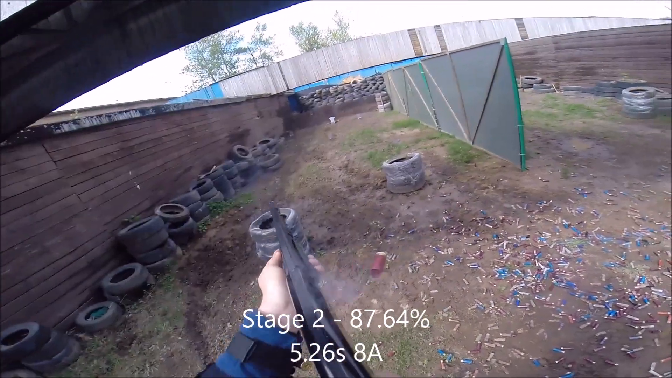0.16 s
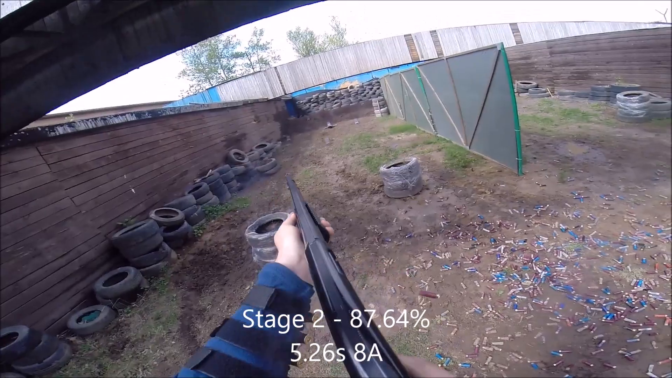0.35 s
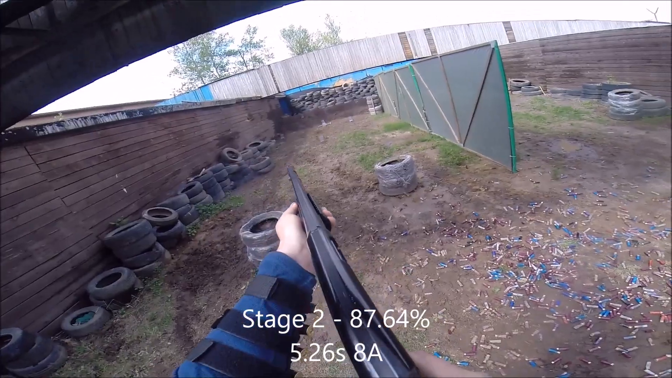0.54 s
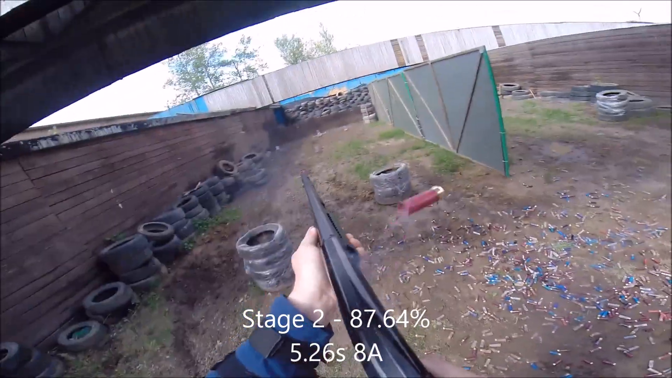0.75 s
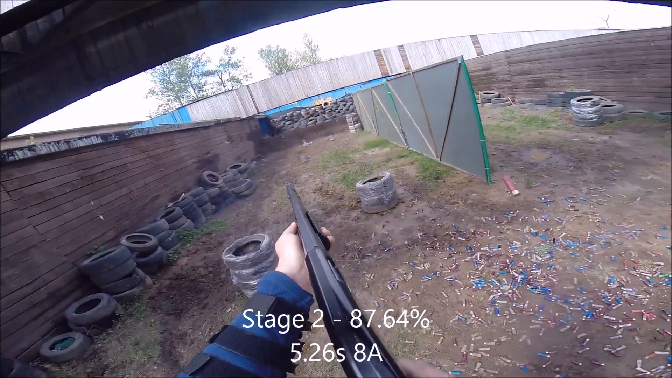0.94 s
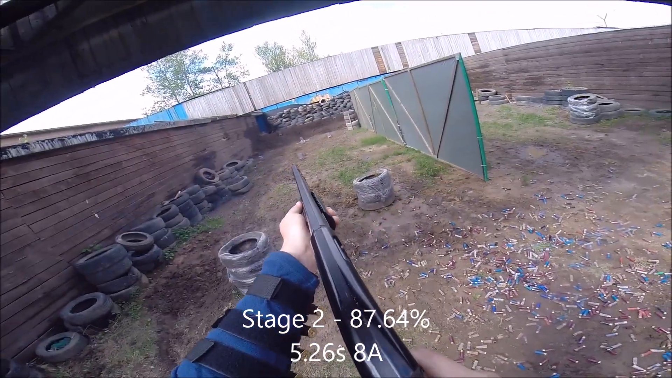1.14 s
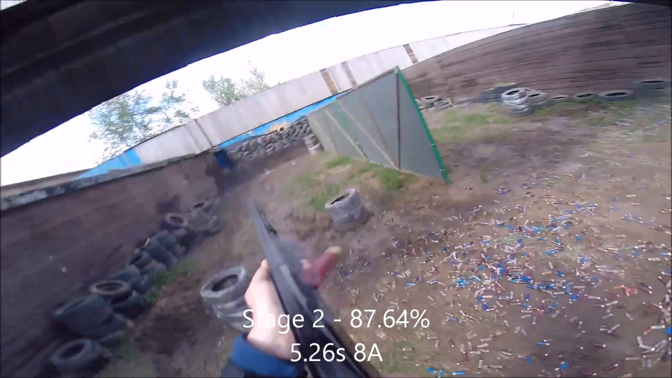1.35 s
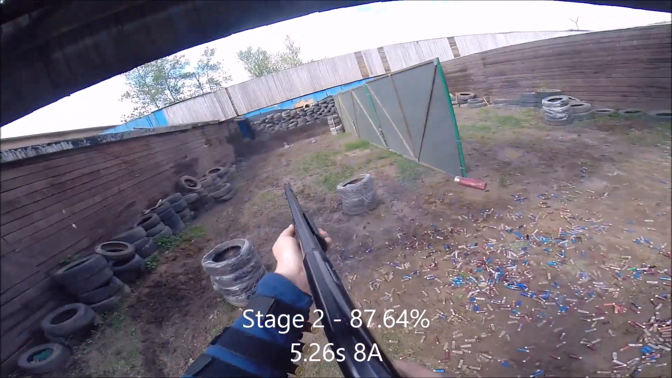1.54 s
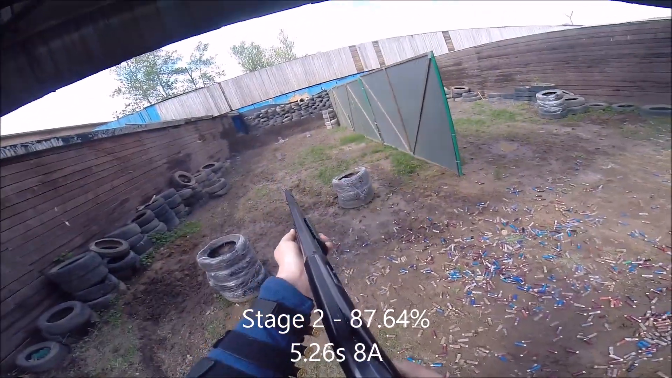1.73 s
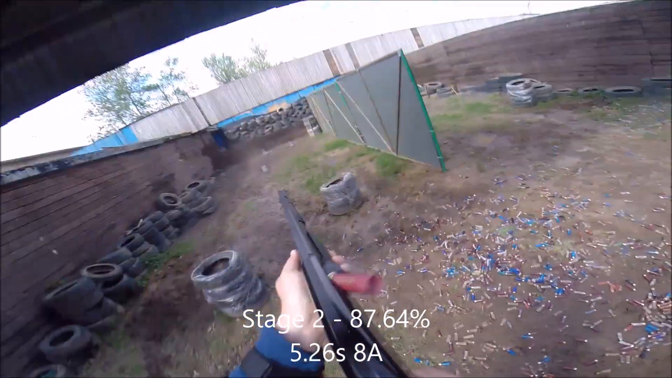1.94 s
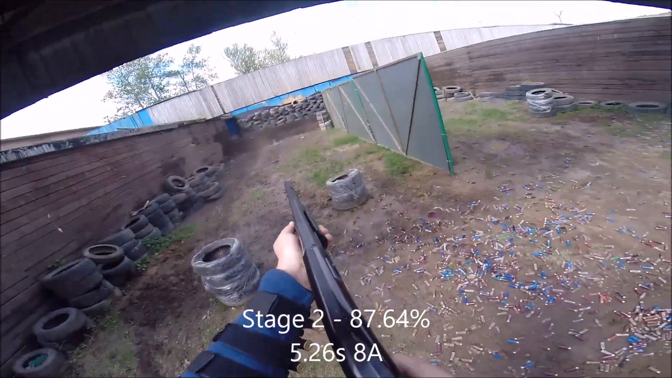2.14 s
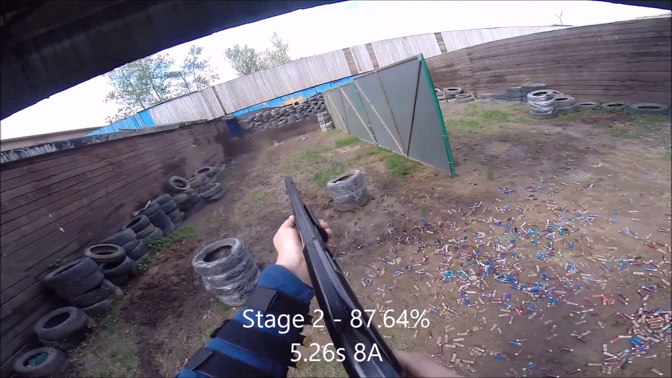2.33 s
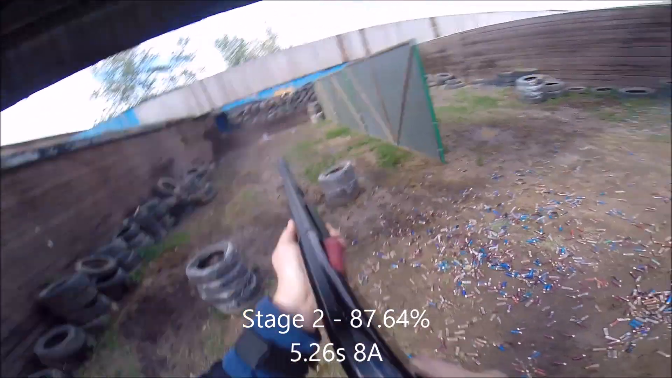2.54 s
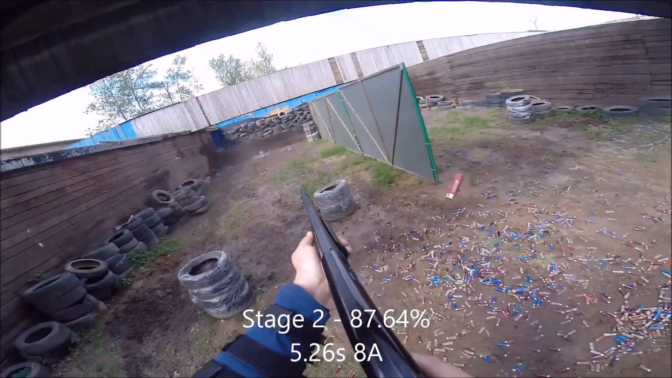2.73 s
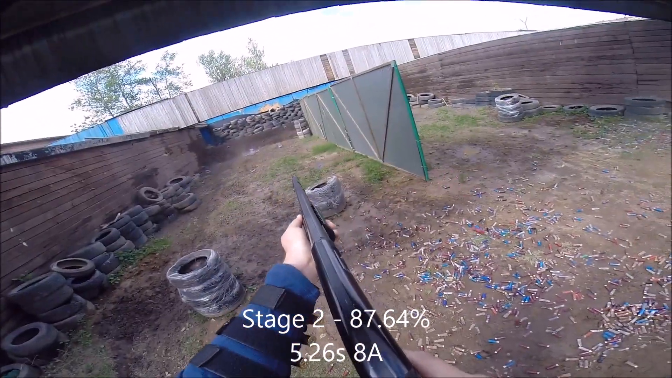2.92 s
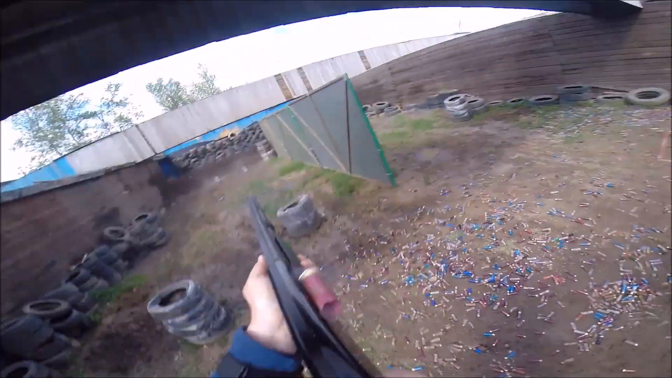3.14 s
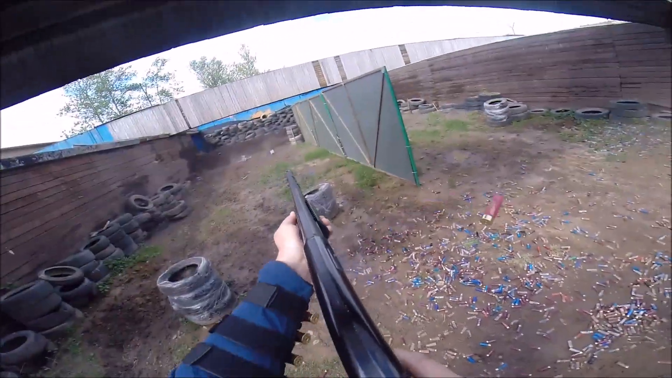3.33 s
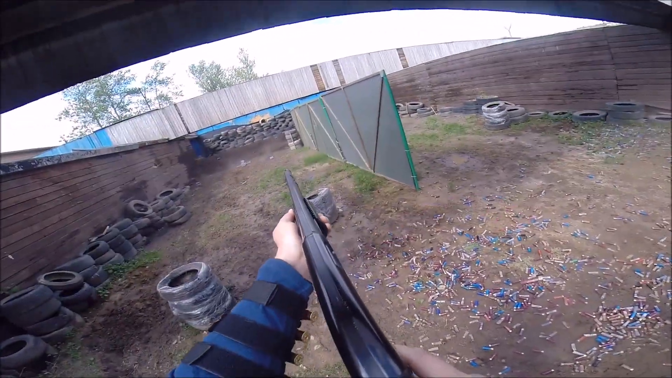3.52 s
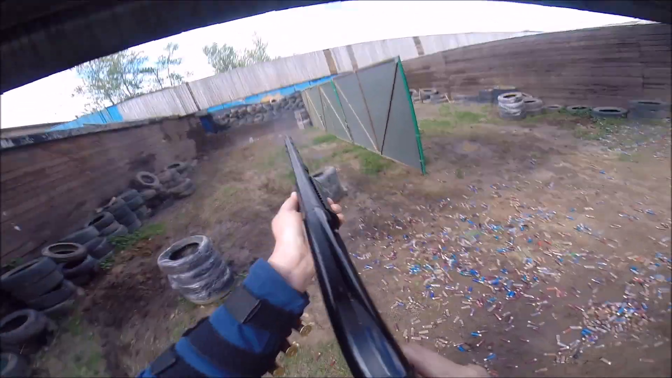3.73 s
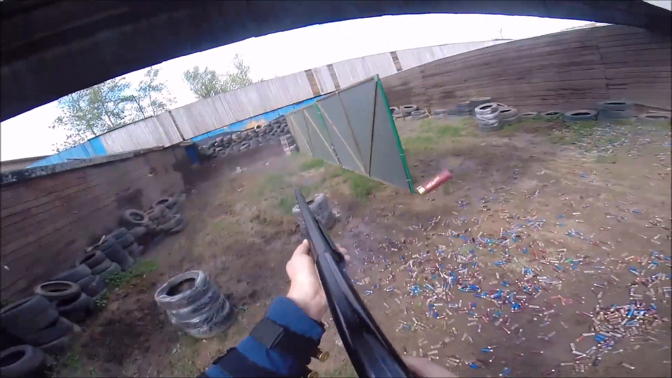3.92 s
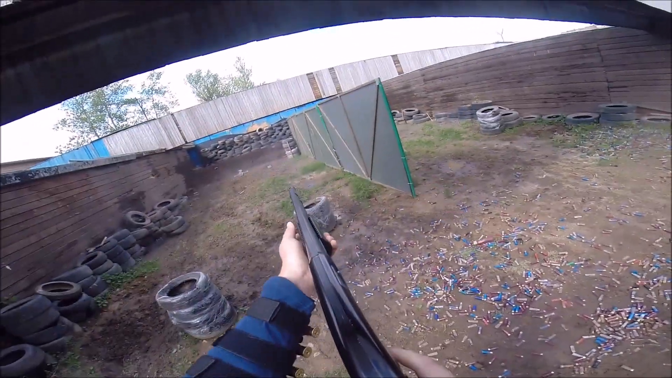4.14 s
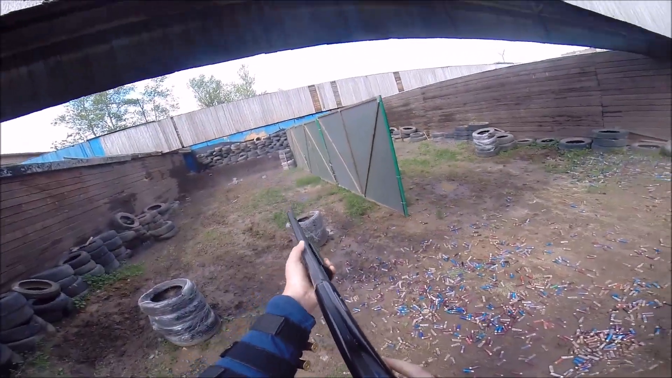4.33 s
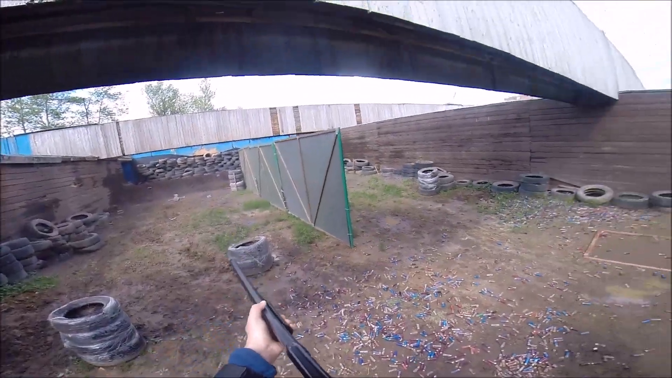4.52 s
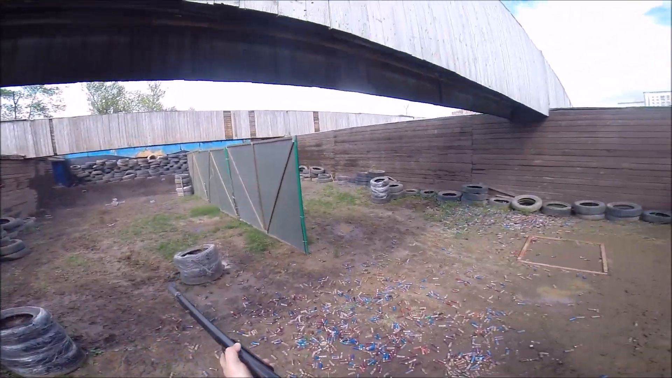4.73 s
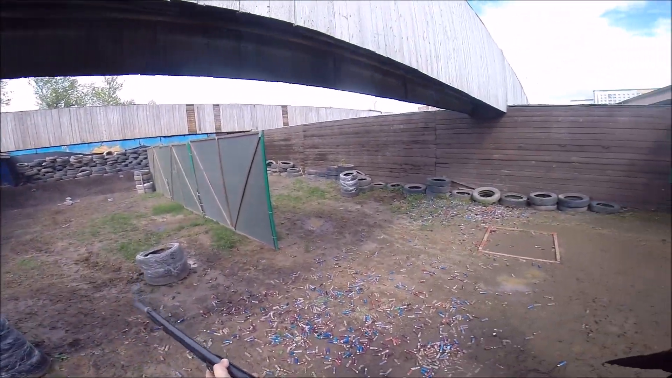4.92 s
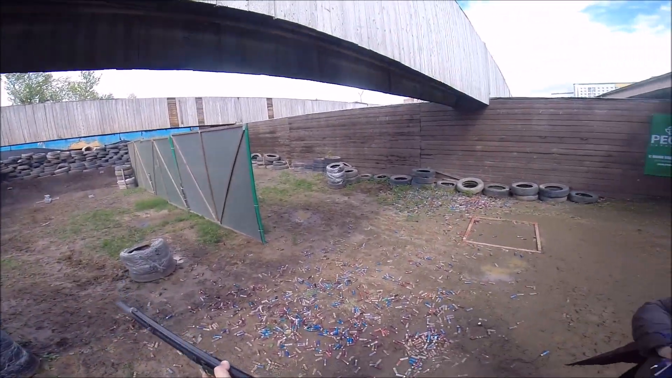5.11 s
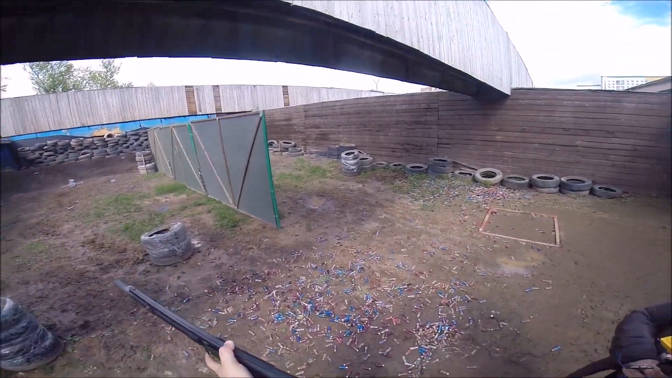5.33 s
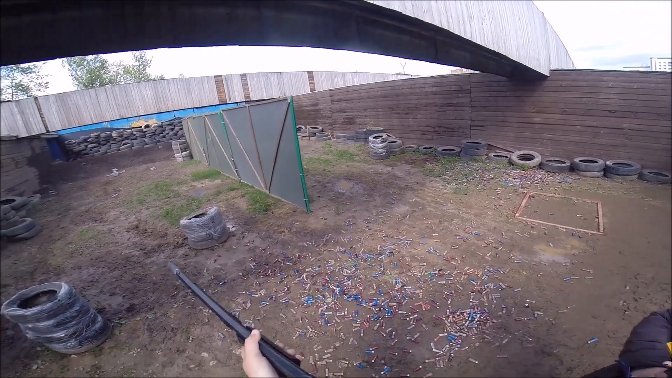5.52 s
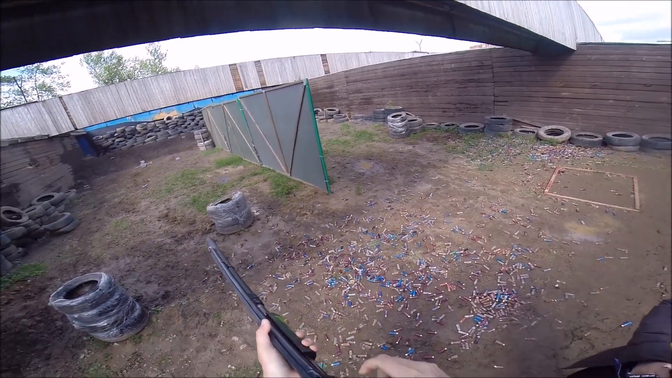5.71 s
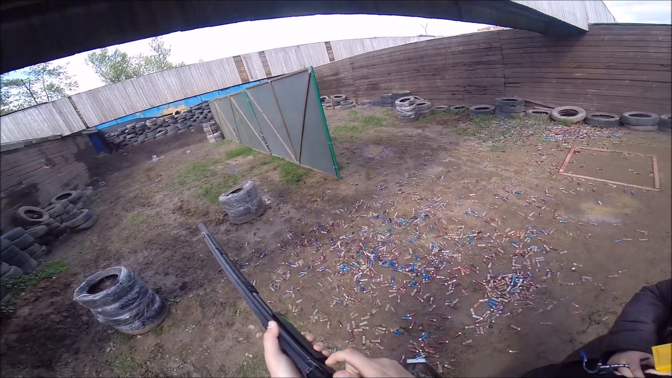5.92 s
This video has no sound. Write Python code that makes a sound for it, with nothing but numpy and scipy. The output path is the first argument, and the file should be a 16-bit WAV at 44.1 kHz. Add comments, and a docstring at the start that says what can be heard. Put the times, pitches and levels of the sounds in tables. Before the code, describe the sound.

A self-loading shotgun fires right at the start and keeps a steady pace, seven shots in all, at about 0, 0.7, 1.3, 1.9, 2.6, 3.1 and 3.8 seconds. Each is a sharp, close crack that overloads the head-worn microphone, followed at once by pellets smacking a steel plate and a short echo off the walls of the outdoor bay. One plate rings faintly near 2.6 seconds. Between shots come tiny trigger clicks, faint sleeve rubs and gear ticks. As the last echo fades, soft open-air hiss comes up over a light wind rumble. Around 4.5 seconds the safety snaps on amid a few low bumps on the microphone. Four dull, faint shots pop from a distant bay between 4.9 and 5.3 seconds. The bolt clicks at 5.5 seconds, a small gust passes, and a sharper metal clack comes at about 6 seconds.

```python
"""A self-loading shotgun fires seven quick shots in a walled outdoor bay, heard from a head camera.
Each time the trigger clicks, the hammer falls and the blast rings the camera housing and overloads
the microphone; pellets smack a steel plate, the walls echo and the trigger resets. Cloth rubs, gear
ticks and the camera mount bumps. Then the safety snaps on, shots pop in a far bay and the bolt is
worked, over open-air hiss and a light wind."""
import sys
import numpy as np
from scipy import signal
from scipy.fft import rfft, irfft
from scipy.io import wavfile
from scipy.ndimage import uniform_filter1d

SR = 44100
rng = np.random.default_rng(int(sys.argv[2]) if len(sys.argv) > 2 else 0)


def to_wav(s):
    """Save 16-bit WAV."""
    ch = np.atleast_2d(s).T  # columns
    pcm = np.round(np.clip(ch, -1, 1) * 32767)  # PCM
    wavfile.write(sys.argv[1], SR, pcm.astype(np.int16))


N = 267406

# Noise colours. Each row: frequency in Hz, relative level in dB.
AIR_SPECTRUM = [(59, -18), (100, -1.5), (260, -7.5), (705, -15.5), (1130, -15), (1420, -17.5), (3320, -15),
                (4200, -22.5), (6020, -20), (6560, -28), (12700, -33.5), (14700, -39), (16000, -66.5)]   # open-air hiss
WIND_SPECTRUM = [(12, 7), (28, 3), (50, -6), (80, -21), (140, -33), (400, -53.5), (2000, -100)]   # wind rumble on the microphone
STEEL_SPECTRUM = [(30, -48.5), (400, -27.5), (1200, -14), (2200, -5), (3000, 0), (4000, -1), (5500, -1.5),
                  (7500, -10.5), (9500, -14), (15500, -25.5)]   # steel meeting steel
GAS_SPECTRUM = [(60, -4.5), (400, 7.5), (900, -.5), (3000, 6.5), (6000, -1), (9000, -6.5), (12000, -38.5),
                (15500, -18)]   # gas rushing from the muzzle
ECHO_SPECTRUM = [(60, -6.5), (150, -11.5), (270, -7), (420, -10), (800, -6), (1000, -6), (1350, -4.5),
                 (1620, 5.5), (2350, 1), (2850, 5), (4300, -6.5), (6200, -8.5), (8000, -22), (15500, -43)]   # the wash between the walls
BOOM_SPECTRUM = [(20, -16), (60, 4), (140, -2.5), (200, -8), (270, -1), (380, -19), (800, -32.5),
                 (4000, -80.5)]   # low boom off the far walls
BUFFET_SPECTRUM = [(12, 7), (28, 6), (55, -7.5), (100, -23), (200, -35), (500, -61), (2000, -100)]   # air stirred by a shot
SPATTER_SPECTRUM = [(30, -43.5), (400, -28.5), (1200, -11.5), (2300, -12.5), (3100, 6.5), (4300, -2.5),
                    (5800, 0), (7200, -11.5), (10000, -19.5), (15500, -39)]   # pellets spattering on a plate
CLOTH_SPECTRUM = [(100, -28), (900, -14.5), (1700, -2), (3000, 6.5), (4300, -10), (6000, -10.5),
                  (8000, -21), (15500, -42)]   # sleeve and sling
SAFETY_SPECTRUM = [(100, -35), (800, -29), (1200, -12), (1900, -22), (3100, -3), (4500, 2.5), (6000, -1),
                   (7500, -18), (15500, -25)]   # the noisy edge of the safety's snap
FAR_SPECTRUM = [(200, -19), (750, -13), (1200, -9.5), (1600, 6), (2100, -5.5), (2800, -3.5), (4000, -21),
                (9000, -35), (15500, -50)]   # shots dulled by walls
# Resonances on top of a colour. Each row: centre in Hz, width in Hz, boost in dB.
RECEIVER_RESONANCES = [(2730, 430, 3.5), (5300, 360, 4), (9100, 700, 5.5)]
ECHO_RESONANCES = [(640, 340, 2.5), (1200, 150, 4.5), (1650, 180, 1.5), (4440, 350, 2), (5400, 130, 2.5),
                   (6150, 400, 2.5), (9300, 1300, 6)]
# Modes of struck steel. Each row: frequency in Hz, relative level in dB, t60 in seconds.
PLATE_RING = [(4200, -7.5, 0.27), (5000, -2.5, .12), (5502, -2.5, .45), (5545, -8, .5), (6100, -7.5, .25)]
SAFETY_RING = [(1210, -29.5, 0.051), (3130, -12, 0.015), (3700, -12, .012), (4460, 2.5, 0.013),
               (5300, -1, 0.011), (5800, -6, 0.0096)]
# The camera housing, rung by a blast. Each row: frequency in Hz, relative level in dB.
HOUSING_MODES = [(1150, -13.5), (1570, -9), (2300, -8), (2620, -8.5), (2930, -2), (3340, -6), (3600, -7),
                 (4180, -20), (4520, -9), (5050, -13.5), (5450, -8), (5900, -13), (7600, -22.5)]
# Sound paths in this bay and from the far one. Each row: delay in seconds, relative level in dB.
WALL_RETURNS = [(.012, -23), (.052, -25.5), (.108, -24.5), (.162, -30)]
FAR_ARRIVALS = [(0, -0.5), (.023, -7), (.064, -12)]

# The shots. Each row: start in seconds, blast level in dB, thump in dB relative to the blast,
# boom level in dB, one unused value.
SHOT_CUES = [(0.0311, -0.5, -12.5, -47, -37), (0.6792, -0.5, -16, -48, -32.5), (1.3422, -1, -4, -44, -32.5),
             (1.9379, -0.5, -9.5, -39, -27.5), (2.5644, -0.5, -12, -44, -32), (3.1391, -1, -8, -41, -33),
             (3.7830, 0, 1.5, -37, -30)]
# The trigger resets after each shot. Each row: start in seconds, level in dB.
RESET_CUES = [(0.3487, -31.5), (0.9949, -37), (1.637, -33), (2.2322, -29.5), (2.8933, -39.5),
              (3.4437, -33.5), (4.1059, -32.5)]
# Pellets hit the plates. Each row: start in seconds, smack level in dB, smack pitch in Hz,
# spatter level in dB, spatter t60 in seconds, ring level in dB.
PLATE_HITS = [(0.0662, -3, 3140, -16, 0.066, -41.5), (0.7432, -13, 3530, -15.5, 0.018, -52),
              (1.427, -9.5, 3290, -13.5, 0.021, -52), (1.9807, -8, 3320, -13, 0.024, -52),
              (2.6382, -12, 3220, -19, 0.064, -27), (3.1999, -4.5, 3430, -14, 0.016, -52),
              (3.868, -14.5, 3260, -15, 0.011, -54)]
# Cloth rubs. Each row: loudest moment in seconds, level in dB.
SCUFF_CUES = [(0.602, -46.5), (1.303, -51.5), (2.482, -50.5), (3.618, -51.5), (3.752, -45.5)]
# Bumps on the camera mount. Each row: start in seconds, level in dB, pitch in Hz.
BUMP_CUES = [(2.09, -38, 269), (2.305, -41.5, 263), (3.955, -23, 80), (4.515, -27.5, 75.6),
             (4.559, -27, 69.6), (4.638, -25.5, 55), (5.722, -26, 42)]
# Shots in a far bay. Each row: start in seconds, level in dB.
FAR_SHOT_CUES = [(4.852, -48), (5.003, -55), (5.1402, -46.5), (5.2804, -39)]
# The bolt and its handle click. Each row: start in seconds, level in dB, t60 in seconds.
BOLT_CUES = [(5.4772, -29, 0.028), (5.5151, -46, 0.027), (5.9812, -40.5, .02), (5.9975, -36, .045),
             (6.0235, -45, 0.054), (6.04, -33, .03), (6.0472, -26.5, .12), (6.0562, -16.5, 0.026)]


def amp(db):
    """Decibels to gain."""
    return 10 ** (np.asarray(db) / 20)


def unit_rms(x):
    """Scale to unit power."""
    return x / np.sqrt(np.mean(x ** 2) + 1e-20)


def ages(seconds):
    """Time axis of one event."""
    return np.arange(int(seconds * SR)) / SR


def colour(x, spectrum, tilt_db=0, peaks=()):
    """Give a noise a spectrum, a tilt per octave and some resonances; rms 1."""
    hz = np.maximum(np.fft.rfftfreq(len(x), 1 / SR), 1)
    points_hz, points_db = np.transpose(spectrum)
    db = np.interp(np.log(hz), np.log(points_hz), points_db) + tilt_db * np.log2(hz)
    for centre, width, peak_db in peaks:
        db = db + peak_db / (1 + (2 * (hz - centre) / width) ** 2)
    return unit_rms(irfft(rfft(x) * amp(db), len(x)))


def noise(t, spectrum, tilt_db=0, peaks=()):
    """Coloured noise along a time axis."""
    return colour(rng.standard_normal(len(t)), spectrum, tilt_db, peaks)


def decay(t, t60, hold_s=0):
    """Hold at 1, then fall 60 dB every t60 seconds."""
    return amp(-60 * np.maximum(t - hold_s, 0) / t60)


def attack(t, seconds):
    """Rise quickly from 0 and settle at 1."""
    return 1 - decay(t, seconds)


def swell(t, peak_s, steepness):
    """Rise to 1 and fall away more slowly."""
    return (t / peak_s * np.exp(1 - t / peak_s)) ** steepness


def ringing(t, modes):
    """Free decay of struck modes."""
    return sum(amp(db) * np.sin(2 * np.pi * hz * t) * decay(t, t60) for hz, db, t60 in modes)


def add(out, s, sound):
    """Mix a sound in at a time."""
    start = max(round(s * SR), 0)
    room = max(len(out) - start, 0)
    out[start:start + len(sound)] += sound[:room]


def air(t):
    """Open-air hiss stays low under the firing and comes up once it is over."""
    rise_at_s, rise_s = 4.29, .42
    level_db = np.interp(t, [rise_at_s, rise_at_s + rise_s], [-72.5, -59])
    return amp(level_db) * noise(t, AIR_SPECTRUM)


def wind(t):
    """Light wind rumbles on the microphone, with one gust."""
    gust_at_s, gust_half_s, gust_db = 5.85, .11, 10
    gust = np.exp(-((t - gust_at_s) / gust_half_s) ** 2)
    return amp(-46 + gust_db * gust) * noise(t, WIND_SPECTRUM)


def burst(spectrum, t60, wet_db, wet_t60, tilt_db=0, peaks=(), bite_s=.002):
    """A hard noise hit: it bites, dies fast and leaves a weak wash off the walls."""
    t = ages(.5)
    envelope = (decay(t, t60) + amp(wet_db) * decay(t, wet_t60)) * attack(t, bite_s)
    return noise(t, spectrum, tilt_db, peaks) * envelope


def steel_click(t60, tilt_db):
    """One steel part meets another, coloured by the gun's receiver."""
    return burst(STEEL_SPECTRUM, t60, wet_db=-18, wet_t60=.31, tilt_db=tilt_db,
                 peaks=RECEIVER_RESONANCES, bite_s=.0029)


def trigger():
    """Three clicks to a shot: slack taken up, trigger let go, reset."""
    out = np.zeros(N)
    for (shot_s, *_), (reset_s, reset_db) in zip(SHOT_CUES, RESET_CUES):
        slack, let_go = (shot_s - .024, -50), (reset_s - .035, -36)
        for s, db in (slack, let_go, (reset_s, reset_db)):
            add(out, s, amp(db) * steel_click(t60=.03, tilt_db=-2.5))
    return out


def hammer():
    """The hammer falls: a sliver of steel noise that runs into the blast."""
    t = ages(.0054)
    return noise(t, STEEL_SPECTRUM) * attack(t, .0059)


def housing_ring(t):
    """The camera housing, driven to its limit, rings at an even level, never twice quite alike."""
    count = len(HOUSING_MODES)
    offsets_db = 1.7 * rng.standard_normal(count)
    phases = rng.uniform(0, 2 * np.pi, count)
    detunes = 1 + .011 * rng.standard_normal(count)
    ring = sum(amp(db + offset_db) * np.sin(2 * np.pi * hz * detune * t + phase)
               for (hz, db), offset_db, detune, phase in zip(HOUSING_MODES, offsets_db, detunes, phases))
    return ring / np.sqrt(uniform_filter1d(ring ** 2, size=200) + 1e-9)


def slap(hz, rise_s):
    """A short pressure pulse, heard as a few swelling and dying cycles of housing resonance."""
    t = ages(.02)
    return swell(t, rise_s, steepness=2) * np.sin(2 * np.pi * hz * t)


def blast(thump_db, attack_s=.0007, hold_s=.0042, thump_s=.0047):
    """The muzzle blast shakes the housing over rushing gas and a thump; the ground slaps back."""
    t = ages(.05)
    crack = amp(-2.5) * housing_ring(t) + amp(-7.5) * noise(t, GAS_SPECTRUM)
    collapse = decay(t, t60=.003, hold_s=hold_s)
    after_ring = amp(-16) * decay(t, t60=.056, hold_s=hold_s)
    envelope = np.minimum(t / attack_s, 1) * np.maximum(collapse, after_ring)
    thump = (1 - t / thump_s) * np.exp(-t / thump_s) * attack(t, .0034)   # push, then suction
    out = crack * envelope - amp(thump_db) * thump
    add(out, .0077, amp(-7) * slap(hz=2560, rise_s=.00016))
    return out


def echo_envelope(t, wall_rise_s=.012):
    """Ground scatter, the wash, the distant surroundings and first wall returns add in power."""
    ground = amp(-10) * decay(t, t60=.049)
    wash = amp(-31.5) * decay(t, t60=.75, hold_s=.2)
    distant = amp(-46.5) * decay(t, t60=3.6)
    walls = [amp(db) * np.clip((t - delay) / wall_rise_s, 0, 1) * decay(t, t60=.17, hold_s=delay)
             for delay, db in WALL_RETURNS]
    return np.sqrt(np.sum(np.square([ground, wash, distant, *walls]), axis=0))


def darken(wash, corner_hz=4000, lift_db=2, loss_db_per_s=15):
    """Echoes start bright and lose treble as they keep bouncing."""
    hz, age, frames = signal.stft(wash, SR, nperseg=256)
    half_octaves_above = np.log2(1 + (hz[:, None] / corner_hz) ** 2)
    gain_db = half_octaves_above * (lift_db - loss_db_per_s * age)
    return signal.istft(frames * amp(gain_db), SR)[1][:len(wash)]


def bay_echoes(wall_pattern, shared=.56, grain_db=3, flutter_db=1.5):
    """Grainy reflections off planks and tyres, partly alike from shot to shot."""
    t = ages(1)
    scatter = np.sqrt(shared) * wall_pattern + np.sqrt(1 - shared) * rng.standard_normal(len(t))
    grain = amp(grain_db * rng.standard_normal(len(t)))
    wash = colour(scatter * grain, ECHO_SPECTRUM, peaks=ECHO_RESONANCES)
    # Flat faces return the blast in one piece.
    for delay, hz in rng.uniform((.015, 2200), (.22, 3600), size=(7, 2)):
        add(wash, delay, amp(10) * slap(hz, rise_s=.0004))
    flutter = unit_rms(uniform_filter1d(rng.standard_normal(len(t)), size=200))
    return darken(wash) * echo_envelope(t) * amp(flutter_db * flutter) * attack(t, .0088)


def buffet(t):
    """Air stirred by the shot rumbles on the microphone."""
    return noise(t, BUFFET_SPECTRUM) * swell(t, peak_s=.12, steepness=1.3)


def boom(t):
    """The far walls send the shot back as a low swell."""
    return noise(t, BOOM_SPECTRUM) * swell(t, peak_s=.14, steepness=12)


def shotgun(hammer_lead_s=.004):
    """Each shot layers hammer, blast, echoes, boom and stirred air."""
    out, t = np.zeros(N), ages(1)
    wall_pattern = rng.standard_normal(len(t))
    for s, blast_db, thump_db, boom_db, _ in SHOT_CUES:
        add(out, s - hammer_lead_s, amp(-19) * hammer())
        add(out, s, amp(blast_db) * blast(thump_db))
        add(out, s, bay_echoes(wall_pattern))
        add(out, s, amp(boom_db) * boom(t))
        add(out, s, amp(-32.5) * buffet(t))
    return out


def plates():
    """The pellet cloud smacks a steel plate and spatters; the plate rings faintly."""
    out, t = np.zeros(N), ages(.44)
    for s, smack_db, hz, spatter_db, t60, ring_db in PLATE_HITS:
        add(out, s, amp(smack_db) * slap(hz, rise_s=.00061))
        add(out, s, amp(spatter_db) * burst(SPATTER_SPECTRUM, t60, wet_db=-25.5, wet_t60=.15))
        add(out, s, amp(ring_db) * ringing(t, PLATE_RING) * attack(t, .1))
    return out


def gear_ticks(ticks_per_s=5.6, level_db=-58, spread_db=2, chances=200):
    """Loose metal parts on the gun and belt tick faintly at random."""
    out, seconds = np.zeros(N), N / SR
    count = rng.binomial(chances, ticks_per_s * seconds / chances)
    for s in rng.uniform(0, seconds, count):
        add(out, s, amp(rng.normal(level_db, spread_db)) * steel_click(t60=.036, tilt_db=-.5))
    return out


def cloth_scuffs(half_s=.035):
    """Sleeve and sling rub as the gun swings to the next plate."""
    out, t = np.zeros(N), ages(.5)
    stroke = np.exp(-(t / half_s - 2) ** 2)
    for s, db in SCUFF_CUES:
        add(out, s - 2 * half_s, amp(db) * noise(t, CLOTH_SPECTRUM) * stroke)
    return out


def mount_bumps():
    """The shooter's movements knock the camera mount: low, damped thuds."""
    out, t = np.zeros(N), ages(.5)
    envelope = decay(t, t60=.1) * attack(t, .0092)
    for s, db, hz in BUMP_CUES:
        add(out, s, amp(db) * np.sin(2 * np.pi * hz * t) * envelope)
    return out


def safety_catch(start_s=4.5392):
    """The safety snaps on: a brief steel ring with a noisy edge."""
    out, t = np.zeros(N), ages(.5)
    ring = ringing(t, SAFETY_RING) * attack(t, .0027)
    edge = amp(-8.5) * burst(SAFETY_SPECTRUM, t60=.011, wet_db=-18, wet_t60=.27)
    add(out, start_s, amp(-16.5) * (ring + edge))
    return out


def far_shots():
    """Dull pops from behind the walls, each with two echoes."""
    out = np.zeros(N)
    for s, db in FAR_SHOT_CUES:
        for delay, path_db in FAR_ARRIVALS:
            pop = burst(FAR_SPECTRUM, t60=.062, wet_db=-12.5, wet_t60=.63)
            add(out, s + delay, amp(db + path_db) * pop)
    return out


def bolt():
    """The bolt and its handle clack against the receiver as they are worked."""
    out = np.zeros(N)
    for s, db, t60 in BOLT_CUES:
        add(out, s, amp(db) * steel_click(t60, tilt_db=-3))
    return out


def scene():
    """Everything meets at the one microphone."""
    t = np.arange(N) / SR
    firing = shotgun() + trigger() + plates()
    handling = gear_ticks() + cloth_scuffs() + mount_bumps() + safety_catch() + bolt()
    return (firing + handling + far_shots() + air(t) + wind(t))[None]


def record(dry, ceiling=.94, cutoff_hz=15400):
    """Microphone overload rounds off the blasts, and a steep low-pass cuts the top."""
    overloaded = ceiling * np.tanh(dry / ceiling)
    low_pass = signal.ellip(10, .1, 80, cutoff_hz, fs=SR, output="sos")
    return signal.sosfilt(low_pass, overloaded)


dry = scene()
out = record(dry)
to_wav(out)
```